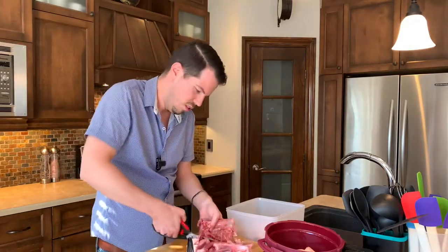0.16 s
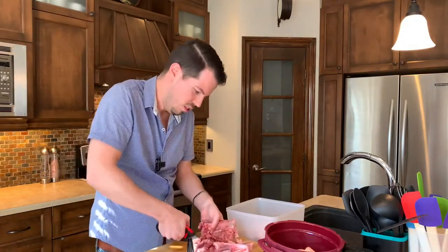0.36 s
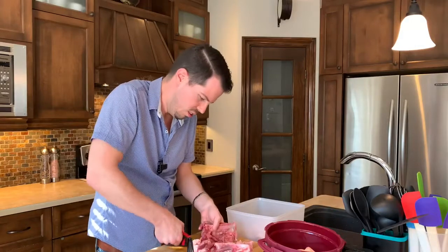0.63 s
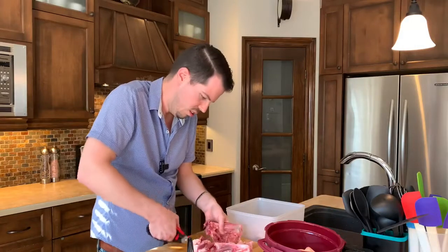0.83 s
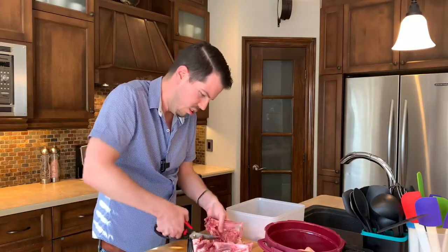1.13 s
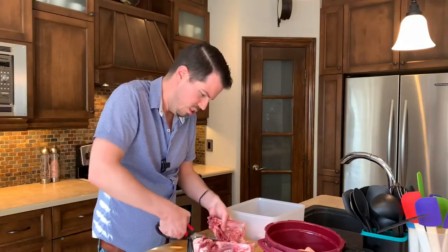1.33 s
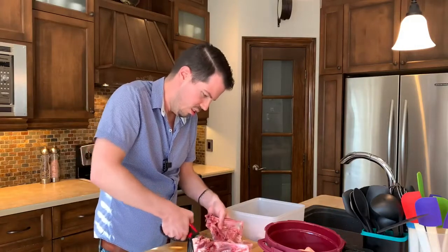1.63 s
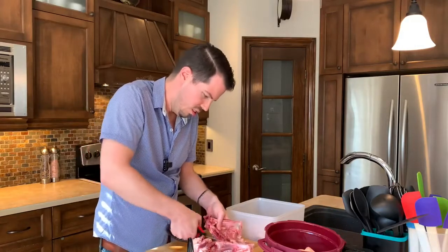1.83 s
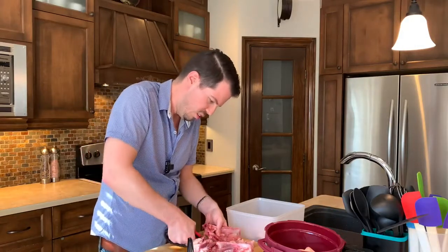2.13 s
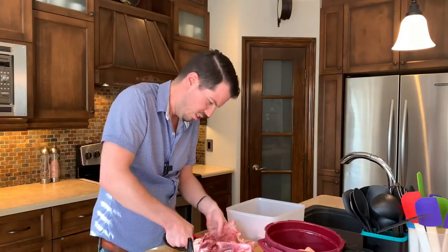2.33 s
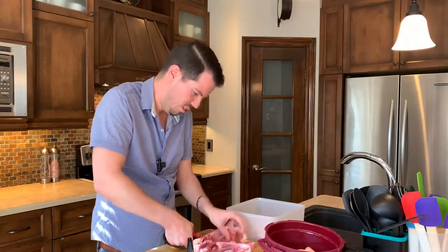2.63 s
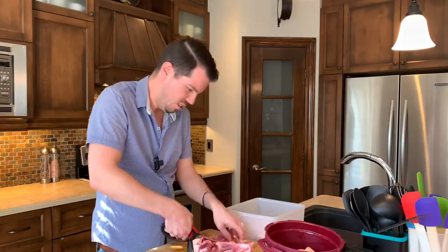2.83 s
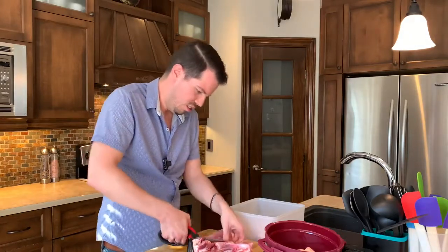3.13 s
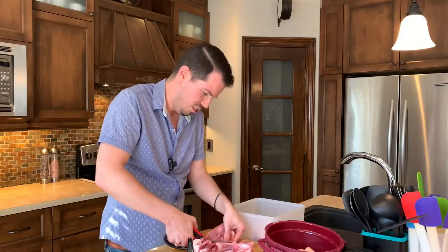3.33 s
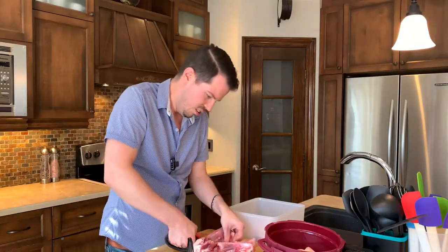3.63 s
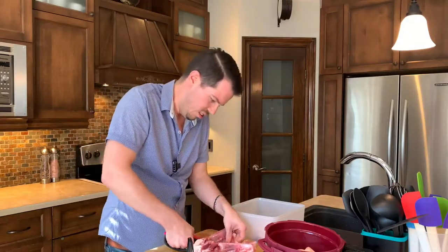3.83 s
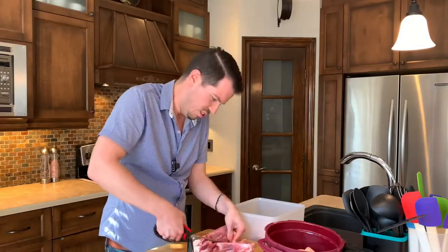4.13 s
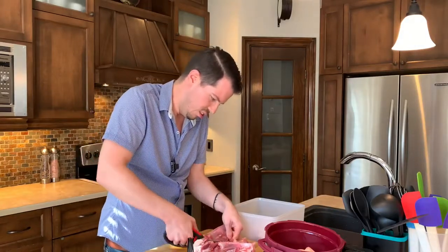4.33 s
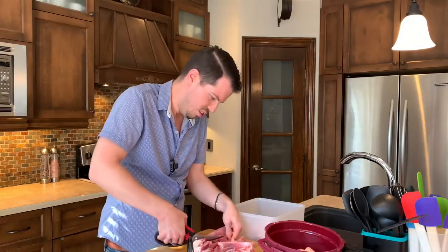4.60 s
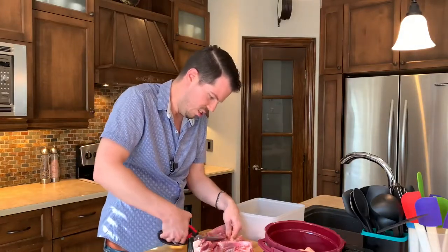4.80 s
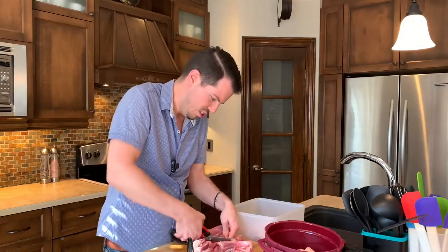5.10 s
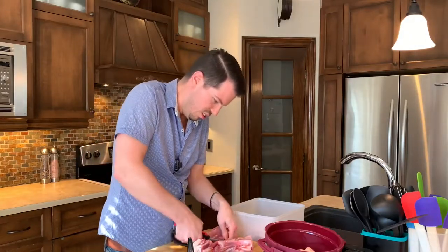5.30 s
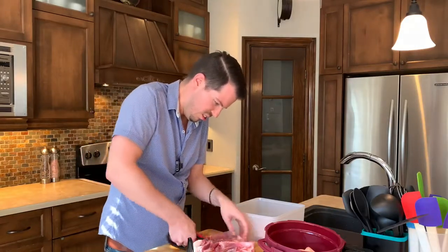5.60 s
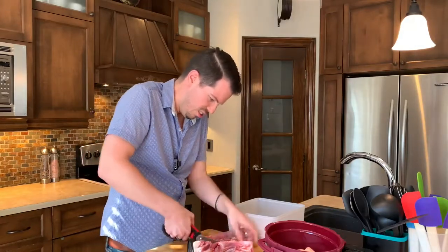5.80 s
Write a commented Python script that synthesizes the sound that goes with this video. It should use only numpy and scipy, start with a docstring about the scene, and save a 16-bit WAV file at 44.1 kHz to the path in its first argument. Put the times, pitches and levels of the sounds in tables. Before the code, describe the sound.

Shears crunch through a raw poultry carcass with sharp bone cracks, one loud snap, wet squelches and board thumps in a quiet humming kitchen.

```python
"""A fridge hum and a low rush of air run throughout: wavering sines over shaped noise.
Over them, poultry shears work through a raw carcass: blades rasp, wet meat squelches and bone splinters in showers
of tiny fractures. A thick bone snaps and the steel rings; joints are ground and torn apart, exciting carcass modes.
Bumps excite the modes of the cutting board, and a counter booms beneath it. Hard reflections and a diffuse echo,
decaying at its own rate in each band, place the cutting, bumps and squelches in a kitchen."""
import sys
import numpy as np
from scipy import signal
from scipy.fft import rfft, irfft
from scipy.io import wavfile
from scipy.ndimage import uniform_filter1d

SR = 44100
rng = np.random.default_rng(int(sys.argv[2]) if len(sys.argv) > 2 else 0)


def wav_out(sig):
    """Save sig, one row per channel (or a flat mono array), as 16-bit PCM at SR to the path in sys.argv[1]."""
    wavfile.write(sys.argv[1], SR, np.round(np.clip(np.atleast_2d(sig).T, -1, 1) * 32767).astype(np.int16))


N = 262395
SIZE = 16384  # samples in one burst, ring or filter spectrum
SPAN_S = .035  # event levels are mean levels over this span, before the room

# moving air, spectral shape: [f/Hz, relative density/dB]
AIR = [(25, -24), (40, -12.5), (62, -8.5), (88, -10.5), (150, -4.5), (205, -2.5), (310, -12.5), (510, -16),
       (800, -23), (1300, -33), (2000, -41), (3200, -43.5), (6300, -50.5), (11000, -47.5), (16000, -55)]
# stereo breadth of the air: [f/Hz, side against mid level/dB]
AIR_SIDE = [(60, -11), (150, -12.5), (300, -11.5), (600, -1), (1200, 2.5), (12000, 1)]
AIR_DB, AIR_WANDER_DB, AIR_WANDER_PER_S = -54.5, 1.64, 12  # mean level, its rms wander, knots per second
# fridge partials: [f/Hz, level/dB]
HUM = [(59.5, -77), (120, -76.5), (150.4, -58), (175.5, -69), (203, -71)]

# kitchen bands: [f/Hz, t60/s, direct level/dB before a common gain, echo level/dB, left-right likeness 0-1]
KITCHEN = [(100.5, 0.84, -2.5, -0.5, 0.9), (291, 0.34, -11, 1, 0.9), (712, 0.47, -5, -1, 0.9),
           (1550, 0.41, -6.5, 4.5, 0), (3900, 0.44, -12, -1, 0.8), (7426, 0.38, -11, 1.5, 0),
           (11440, 0.38, 5, -1, 0), (16000, .2, 0.5, -14, 0.1)]
DIRECT_GAIN_DB = 3.5  # common gain of the direct and reflected paths
# nearby hard surfaces: [delay/ms, level against the direct sound/dB, left lead/ms]
REFLECTIONS = [(1.0, -15.5, -0.02), (5.3, -9.5, 0.013), (8.6, -7, -0.46)]
# overall tone: [f/Hz, level/dB]
TONE = [(15, -20.5), (35, -6.5), (60, -3.5), (7000, -2.5), (12000, -5), (13500, -6), (16000, -1.5)]
HEADROOM, TOP_HZ = 1.1, 16250  # ceiling of the rounded peaks, upper band limit

# wet meat gripped, pulled and sheared: [t/s, length/ms, level/dB, centre f/Hz]
MEAT = [(.28, 55, -61, 4100), (1.255, 5.6, -73, 5000), (1.611, 12, -63, 2310), (2.734, 7.8, -67.5, 1502),
        (2.93, 28, -69.5, 1300), (3.081, 57, -66, 1470), (3.2, 39, -64, 1500), (3.491, 23.6, -59, 1700),
        (4.169, 10.8, -73.5, 3584), (4.301, 12.6, -70.5, 1800), (5.87, 24, -63, 3980)]
SQUASH_MS, SQUASH_DB, SQUASH_HZ = 0.63, -64.5, 1703  # the meat squelches under every bump
# faint squelches as the fingers shift their grip, and the rms spread from one grip to the next
HANDLING_PER_S, HANDLING_MS, HANDLING_DB, HANDLING_HZ = 8, 30, -84, 3000
HANDLING_SPREAD_DB, HANDLING_SPREAD_OCTAVES = 3, .4

# pushes and bumps on the board: [t/s, level/dB, board f favoured by the place of contact/Hz]
KNOCKS = [(0.553, -49.5, 137), (1.908, -42.5, 137), (1.906, -43.5, 330), (1.907, -51, 710),
          (2.075, -55, 385), (2.333, -41.5, 250), (3.473, -53.5, 604), (3.545, -41, 293), (3.546, -46, 670),
          (3.649, -39, 540), (3.654, -39.5, 240), (3.694, -38, 225), (1.613, -64, 479), (4.719, -53, 450),
          (5.008, -51.5, 303), (5.164, -50, 588), (5.192, -52, 606), (5.348, -40, 123), (5.348, -36, 330),
          (5.361, -39.5, 453), (5.376, -40, 295), (5.553, -35.5, 549), (5.740, -45.5, 280)]
# cutting board modes: [f/Hz, relative level/dB, t60/s]
BOARD = [(137, -4.5, 0.19), (239.3, -1.5, 0.1408), (278, -2.5, 0.14), (330, -3, 0.054), (385, -2.5, 0.028),
         (506.9, 0, 0.13), (552.7, -1.5, 0.079), (637, -1.5, .07), (714, -11.5, 0.029), (1027, -14, 0.04)]
# counter and cabinet modes: [f/Hz, relative level/dB, t60/s]
COUNTER = [(40.53, -16, 0.36), (62.64, -0.5, 0.16), (71, -4, 0.2), (106.9, 0, 0.086)]
SLAP_DB = -6.5  # the meat's slap against the ring of the board
SAG_DELAY_S, SAG_DB = 0.026, -22  # the counter takes up each push later, at this level against it
SAG_HZ, SAG_BOOST_DB = 245, 13.5  # added most where the push favours this pitch of the board

# light scrape of the blade tips: [t/s, level/dB]
BLADE_TICK = (2.642, -65)
# blade tip modes: [f/Hz, relative level/dB, t60/s]
BLADE_TIP = [(4950, -5, .007), (6950, -12, .006), (9100, 0, .005), (10100, -6, .004)]
# blades rubbing along bone and each other: [t/s, length/ms, level/dB, centre f/Hz, width/octaves]
RASPS = [(0.179, 15, -77.5, 3200, 0.47), (1.068, 5, -76, 4210, 0.34), (1.803, 12, -73.5, 4160, 0.5),
         (1.9961, 0.4, -47.5, 2590, 0.4), (3.171, 37, -72, 3300, .8), (3.262, 5, -61.5, 2650, 0.22),
         (3.263, 4.8, -61.5, 3870, 0.3), (3.273, 1.8, -63, 3330, 0.26), (3.286, 5, -63, 3700, .7),
         (4.935, 23.5, -73, 3900, 0.75)]
RASP_SKIRT_DB = -21.5  # broad remainder around a rasp's band

# joints pressed, ground and torn apart: [t/s, crumbling time/ms, level/dB, favoured f/Hz, favour/dB]
JOINT = [(1.614, 9, -66, 1023, 22), (3.545, 1.4, -54, 2850, 13), (5.161, 6.9, -55.5, 2010, 23),
         (5.186, 13.6, -52.5, 2160, 14), (5.256, 8.4, -48.5, 2260, 17), (5.292, 16, -48.5, 1970, 31),
         (5.347, 2.6, -35.5, 3980, 1), (5.352, 2.3, -35, 2510, 11), (5.364, 2.5, -42.5, 1290, 12),
         (5.381, 3.7, -46.5, 3370, 3), (5.404, 2.6, -46.5, 950, 24), (5.557, 1.5, -45.5, 1010, 16.5),
         (5.581, 1.9, -44, 1260, 22), (5.603, 5, -49.5, 1650, 18), (5.741, 2, -57, 902, 27)]
# rib and backbone modes: [f/Hz, relative level/dB, t60/s]
CARCASS = [(870, -7, .035), (990, -3, .04), (1270, -3, .05), (1460, -8, .025), (1610, -8, .04),
           (2040, -5, .022), (2160, -5, .022), (2350, -8, .025), (2600, -1, .025), (2930, -3, .022),
           (3070, -3, .022), (3470, -8, .02), (3830, 2, .028), (4200, -8, .02), (4690, -7, .025)]
JOINT_DETUNE, JOINT_SCATTER_DB = .012, 2.5  # rms change of mode pitch (fraction) and level per jerk

# the thick bone breaks in quick steps: [t/s, crumbling time/ms, level/dB before smoothing, tilt/(dB per octave)]
SNAP = [(.5455, 4, -37, -1), (.5520, .5, -19.5, 3), (.5562, 1.1, -22, -1.5), (.5600, 1.3, -24, -1)]
# colour of every snap step: [f/Hz, relative level/dB]
SNAP_COLOUR = [(40, -23.5), (150, -18), (600, -11), (1300, -14), (2100, -3), (2700, -2.5), (3100, 0),
               (3700, 5.5), (4400, 3.5), (5100, 6), (5900, -1.5), (6900, 7.5), (7600, 0), (8400, -2.5),
               (9400, -4.5), (11600, 2), (13000, -5), (16000, -14)]
# steel blade modes: [f/Hz, relative level/dB, t60/s]
BLADES = [(2848, -6, .19), (3532, -3, .25), (3643, 1, .28), (3850, -3, .42), (4400, -5, .42),
          (4834, -5, .35), (4964, -2, .35), (5207, -1, .3), (6670, -3, .14), (6723, -3, .18),
          (6843, -3, .18), (7700, -7, .13), (10630, -5, .1), (11230, -3, .08)]
BLADES_DB = -33.5  # level of the blades clashing shut

# bone splintering: [t/s, crumbling time/ms, level/dB before a common gain, dulled above f/Hz, ring f/Hz]
CRACKS = [(0.381, 9.8, -45, 12300, 4370), (.405, 27, -53, 12080, 3640), (.447, 0.96, -43.5, 12800, 4550),
          (0.463, 17, -50.5, 11940, 5050), (.493, 10.5, -42.5, 11100, 2320),
          (1.612, 5.9, -61.5, 8880, 2420), (1.889, 7.7, -60, 11000, 2803), (1.9046, 0.88, -41, 14540, 4080),
          (1.9127, 2.6, -48, 13100, 3330), (1.92, 18, -43, 11600, 2350), (2.0737, 2.1, -44.5, 15100, 4980),
          (2.083, 4.7, -49.5, 11000, 4480), (2.108, 3.2, -51, 11100, 4900), (3.471, 6.1, -55, 5430, 4260),
          (3.545, 2.2, -46, 3240, 2670), (3.608, 14.6, -46, 6500, 4060), (3.633, 3.4, -45.5, 14000, 2840),
          (3.644, 14, -45.5, 6100, 2830), (3.671, 9.9, -41.5, 12000, 2250), (3.697, 2.7, -54, 13100, 4180),
          (3.725, 5.2, -60, 12000, 3280), (4.721, 3.4, -64, 2880, 2676), (5.163, 27, -50, 8200, 2692),
          (5.2539, 0.56, -47.5, 13900, 3330), (5.332, 5.5, -43, 10900, 3900),
          (5.346, 3.2, -30.5, 5040, 4140), (5.5541, 1.7, -45.5, 7600, 3680)]
CRACKS_GAIN_DB = -3.5  # common gain of the splintering
# colour of splintering bare bone: [f/Hz, relative level/dB]
BONE = [(100, -4), (600, 8.5), (1600, 8), (4300, 7.5), (7500, -1), (11000, 1), (15500, 4)]
# resonances of a bone fragment: [share of its ring f, boost/dB]
PIECE_MODES = [(0.99, 7.5), (1, 2.5), (0.18, 5), (0.33, 1.5), (0.18, 2.5)]
PIECE_OCTAVES = 0.031  # half-width of those resonances
MUFFLE_DB_PER_OCTAVE = 18.5  # final slope at which the meat around a bone dulls it


def amp(db):
    """Decibel law: convert a level to an amplitude ratio."""
    return 10 ** (np.asarray(db) / 20)


def unit(x):
    """Energy normalisation: scale the sum of squares to one."""
    return x / np.sqrt(np.sum(x ** 2) + 1e-18)


def on_log(hz, points):
    """Logarithmic frequency scale: interpolate (f/Hz, value) points along it."""
    f, value = np.transpose(sorted(map(tuple, points)))
    return np.interp(np.log(np.maximum(hz, 1)), np.log(f), value)


def bins(size):
    """Discrete spectrum: bin frequencies in Hz, raised by 1 Hz to keep clear of zero."""
    return np.fft.rfftfreq(size, 1 / SR) + 1


def colour(x, db):
    """Minimum-phase filtering: fold the cepstrum to get a causal response with db gain at bins(SIZE)."""
    cepstrum = irfft(np.log(amp(db)))
    cepstrum[1:SIZE // 2] *= 2
    cepstrum[SIZE // 2 + 1:] = 0
    response = irfft(np.exp(rfft(cepstrum)))[:SIZE // 8]
    return signal.fftconvolve(x, response)[:len(x)]


def hump(hz, centre_hz, octaves, height_db):
    """Resonance curve: a rise in dB that halves at the given distance in octaves."""
    return height_db / (1 + (np.log2(hz / centre_hz) / octaves) ** 2)


def evened(x, order=160):
    """Spectral whitening: level a burst over `order` bins, so that it excites all pitches nearly alike."""
    power = uniform_filter1d(np.abs(rfft(x)) ** 2, order)
    return unit(colour(x, -10 * np.log10(power / power.mean() + .01)))


def smoothed(x, order=20, size=200):
    """Ripple equalisation: flatten detail `order` bins wide, keeping the shape `size` bins wide."""
    power = np.abs(rfft(x, SIZE)) ** 2
    ripple = uniform_filter1d(power, order) / (uniform_filter1d(power, size) + 1e-18)
    return colour(x, -10 * np.log10(np.abs(ripple) + .02))


def add(track, s, sound, db):
    """Superposition: mix in a sound at s; unit energy gives a mean level of db over SPAN_S."""
    i = max(int(s * SR), 0)
    part = sound[:max(N - i, 0)]
    track[i:i + len(part)] += part * amp(db) * np.sqrt(SPAN_S * SR)


def fractures(ms, per_s, spread_db, first):
    """Random fracture: a first break and a dying shower of uneven ones; slow crumbling starts more gently."""
    t, crumble_s = np.arange(SIZE) / SR, ms / 1000
    happens = rng.random(SIZE) < per_s / SR
    sizes_db = spread_db * np.minimum(rng.exponential(size=SIZE), 3)
    sizes = amp(sizes_db) * rng.choice([-1, 1], SIZE)
    swell = 1 - np.exp(-t / (0.85 * crumble_s))
    shower = unit(happens * sizes * swell * np.exp(-t / crumble_s))
    shower[0] += first * np.exp(-crumble_s / 0.015)
    return unit(shower)


def ring(hz, t60):
    """Free damped vibration: one sine mode falls 60 dB in t60, with unit energy."""
    t = np.arange(SIZE) / SR
    return unit(np.sin(2 * np.pi * hz * t) * np.exp(-np.log(1000) * t / t60))


def struck(modes):
    """Modal superposition: all modes of an object start together, with unit energy."""
    return unit(sum(amp(db) * ring(hz, t60) for hz, db, t60 in modes))


def background():
    """Stationary noise and tones: shaped stereo noise for moving air, slowly wavering sines for the fridge."""
    hz, t = bins(N), np.arange(N) / SR
    mid, side = rfft(rng.standard_normal((2, N))) * amp(on_log(hz, AIR))
    air = irfft(mid + np.array([[1], [-1]]) * side * amp(on_log(hz, AIR_SIDE)), N)
    hum = 0
    for f, db in HUM:
        waver = np.interp(t, np.linspace(0, t[-1], num=24), rng.standard_normal(24))
        # the same waver moves level (dB) and phase (rad)
        tone = np.sin(2 * np.pi * f * t + 0.21 * waver)
        hum = hum + np.sqrt(2) * amp(db + 0.5 * waver) * tone
    knots = np.arange(0, t[-1] + 1, 1 / AIR_WANDER_PER_S)
    wander_db = AIR_WANDER_DB * np.interp(t, knots, rng.standard_normal(len(knots)))
    return air / air.std() * amp(AIR_DB + wander_db) + hum


def kitchen(x, lead_ms, build_ms):
    """Room response: direct sound leading on the left, hard reflections, and an echo with a t60 per band."""
    size = 2 * SIZE
    t, hz, rows = np.arange(size) / SR, bins(size), np.array(KITCHEN)
    sides = np.array([[1], [-1]])  # left, right
    paths = 0
    # the first path is the direct sound
    for ms, db, lead in [(0.00064, 0.0028, lead_ms)] + list(REFLECTIONS):
        delay_s = (ms + (lead_ms - sides * lead) / 2) / 1000
        paths = paths + amp(db) * np.exp(-2j * np.pi * hz * delay_s)
    response = irfft(paths * amp(on_log(hz, rows[:, [0, 2]]) + DIRECT_GAIN_DB))
    response[:, SIZE:] = 0  # drop the wrapped-around half

    mid, side = rfft(rng.standard_normal((2, size)))
    swell = 1 - np.exp(-t * 1000 / build_ms)
    echo = 0
    for k, (_, t60, _, echo_db, likeness) in enumerate(KITCHEN):
        # triangular crossfade between neighbouring bands
        band = on_log(hz, zip(rows[:, 0], np.arange(len(rows)) == k))
        shared = np.sqrt((1 + likeness) / 2) * mid
        opposed = np.sqrt((1 - likeness) / 2) * side
        noise = irfft(band * (shared + sides * opposed))
        echo = echo + amp(echo_db) * noise * unit(swell * np.exp(-np.log(1000) * t / t60))
    response += np.array([smoothed(channel, order=28) for channel in echo])
    return signal.fftconvolve(x[None], response, axes=1)[:, :N]


def squelch(ms, centre_hz):
    """Parting of wet fibres: a cloud of tiny ticks swells and dies away around one pitch."""
    swell = 1 - np.exp(-np.arange(SIZE) / SR * 1000 / max(ms, 1))
    ticks = fractures(ms, per_s=2400, spread_db=1, first=0) * swell ** 2
    octaves_off = np.hypot(np.log2(bins(SIZE) / centre_hz), .35)  # rounded at the centre
    return unit(colour(ticks, np.maximum(-23 * octaves_off, -65)))


def meat():
    """Wet deformation: meat squelches when pulled, at every bump, and faintly under the fingers all along."""
    out = np.zeros(N)
    for s, ms, db, centre_hz in MEAT:
        add(out, s, squelch(ms, centre_hz), db)
    for s, _, _ in KNOCKS:
        add(out, s, squelch(SQUASH_MS, SQUASH_HZ), SQUASH_DB)
    for s in np.arange(0, N / SR, 1 / HANDLING_PER_S):
        strength, pitch = rng.standard_normal(2)
        grip = squelch(HANDLING_MS, HANDLING_HZ * 2 ** (HANDLING_SPREAD_OCTAVES * pitch))
        grip_db = HANDLING_DB + HANDLING_SPREAD_DB * strength
        add(out, s + rng.random() / HANDLING_PER_S, grip, grip_db)
    return out


def board():
    """Selective modal excitation: contact favours some board modes; meat slaps and the counter booms."""
    out = np.zeros(N)
    # the heavy counter is slow to get moving
    boom = unit(struck(COUNTER) * (1 - np.exp(-np.arange(SIZE) / SR / 0.018)))
    for s, db, favoured_hz in KNOCKS:
        detune = 1 + 0.0092 * rng.standard_normal(len(BOARD))  # the load on the board shifts
        modes = 0
        for k, (f, mode_db, t60) in enumerate(BOARD):
            favour_db = hump(f, favoured_hz, octaves=0.35, height_db=12.5)
            modes = modes + (-1) ** k * amp(mode_db + favour_db) * ring(f * detune[k], t60)
        contact = evened(fractures(ms=6.5, per_s=2400, spread_db=1.0, first=0.1), order=40)
        slap_db = hump(bins(SIZE), centre_hz=1.486 * favoured_hz, octaves=3.3, height_db=72.5)
        slap = colour(contact, slap_db)
        add(out, s, unit(modes) + amp(SLAP_DB) * unit(slap), db)
        boost_db = hump(favoured_hz, SAG_HZ, octaves=0.38, height_db=SAG_BOOST_DB)
        add(out, s + SAG_DELAY_S, boom, db + SAG_DB + boost_db)
    return out


def blade_tick():
    """Scraping contact: blade tips pass each other, exciting their short modes and a broad scrape."""
    out = np.zeros(N)
    s, db = BLADE_TICK
    contact = evened(fractures(ms=1.8, per_s=4100, spread_db=4, first=0.6))
    scrape = colour(contact, hump(bins(SIZE), centre_hz=8030, octaves=2.1, height_db=20.5))
    tips = signal.fftconvolve(contact, struck(BLADE_TIP))[:SIZE]
    add(out, s, unit(unit(tips) + amp(-10) * unit(scrape)), db)
    return out


def rasps():
    """Stick-slip friction: a blade slips in quick ticks, concentrated in one band of pitches."""
    out, hz = np.zeros(N), bins(SIZE)
    for s, ms, db, centre_hz, octaves in RASPS:
        slips = evened(fractures(ms, per_s=700, spread_db=5, first=.8))
        octaves_off = np.log2(hz / centre_hz)
        band = 1 / (1 + (2 * octaves_off / octaves) ** 4)
        skirt = amp(RASP_SKIRT_DB) / (1 + octaves_off ** 2)
        add(out, s, unit(colour(slips, 20 * np.log10(band + skirt))), db)
    return out


def joint():
    """Jerky excitation of a resonator: gristle and bone yield, and each jerk favours other carcass modes."""
    out = np.zeros(N)
    for s, ms, db, favoured_hz, favour_db in JOINT:
        strain, grip = rng.standard_normal((2, len(CARCASS)))
        body = 0
        for k, (f, mode_db, t60) in enumerate(CARCASS):
            favoured_db = hump(f, favoured_hz, octaves=0.2, height_db=favour_db)
            gain = amp(mode_db + JOINT_SCATTER_DB * grip[k] + favoured_db)
            body = body + (-1) ** k * gain * ring(f * (1 + JOINT_DETUNE * strain[k]), t60)
        jerks = evened(fractures(ms, per_s=700, spread_db=5, first=.9), order=40)
        add(out, s, unit(signal.fftconvolve(jerks, body)[:SIZE]), db)
    return out


def snap():
    """Brittle failure: the thick bone breaks in steps that merge into one crack, and the blades clash shut."""
    steps, out, hz = np.zeros(N), np.zeros(N), bins(SIZE)
    for s, ms, db, tilt_db in SNAP:
        shower = evened(fractures(ms, per_s=16000, spread_db=2, first=.25))
        step_db = on_log(hz, SNAP_COLOUR) + tilt_db * np.log2(hz / 5000)
        add(steps, s, unit(colour(shower, step_db)), db)
    start = int(SNAP[0][0] * SR)
    out[start:] = smoothed(steps[start:])
    add(out, SNAP[1][0], struck(BLADES), BLADES_DB)  # the clash falls on the second step
    return out


def crunches():
    """Splintering: thin bones shed fractures, dulled by the meat; resonances colour each piece."""
    out, hz = np.zeros(N), bins(SIZE)
    for s, ms, db, dull_hz, ring_hz in CRACKS:
        shower = smoothed(fractures(ms, per_s=1300, spread_db=5, first=.55), order=60, size=600)
        piece_db = sum(hump(hz, share * ring_hz, PIECE_OCTAVES, boost_db) for share, boost_db in PIECE_MODES)
        muffle_db = -MUFFLE_DB_PER_OCTAVE * np.log2(1 + (hz / dull_hz) ** 4) / 4
        add(out, s, colour(shower, on_log(hz, BONE) + piece_db + muffle_db), db + CRACKS_GAIN_DB)
    return out


def scene():
    """Common source position: everything on the board shares one place in the room."""
    cutting = crunches() + snap() + joint() + rasps() + blade_tick()
    return kitchen(cutting + board() + meat(), lead_ms=.285, build_ms=1.5) + background()


def record(dry):
    """Overall tone: deep rumble and some top are softened, peaks are rounded off and the band is limited."""
    heard = np.array([colour(channel, on_log(bins(SIZE), TONE)) for channel in dry])
    heard = HEADROOM * np.tanh(heard / HEADROOM)
    band_limit = signal.ellip(10, .2, 80, TOP_HZ, fs=SR, output="sos")
    return signal.sosfilt(band_limit, heard)


dry = scene()
out = record(dry)
wav_out(out)
```